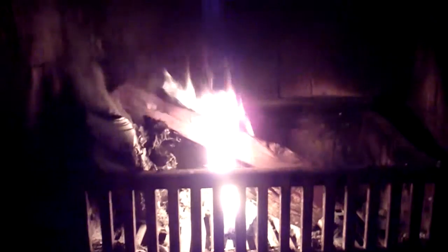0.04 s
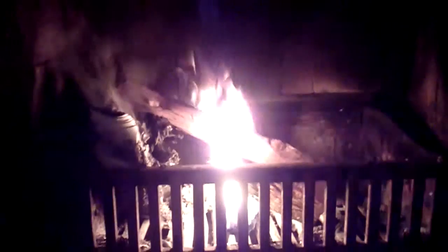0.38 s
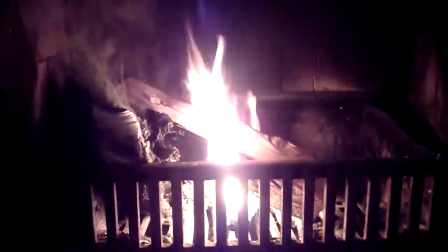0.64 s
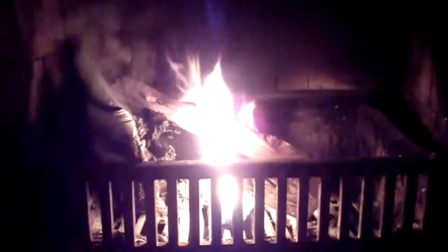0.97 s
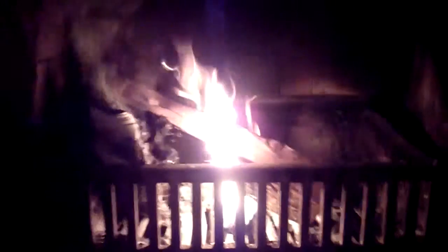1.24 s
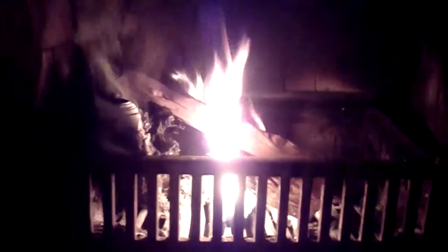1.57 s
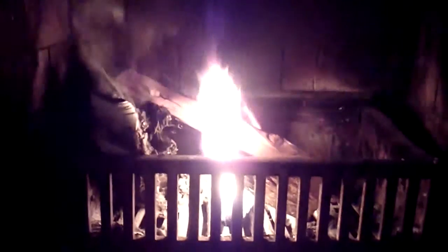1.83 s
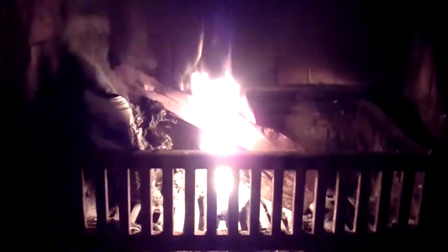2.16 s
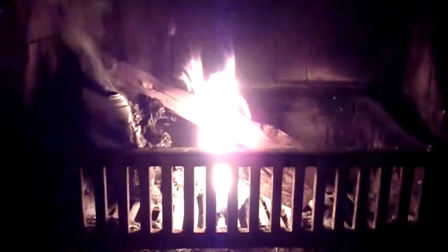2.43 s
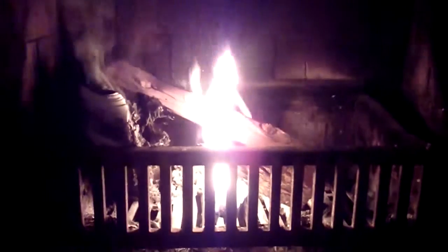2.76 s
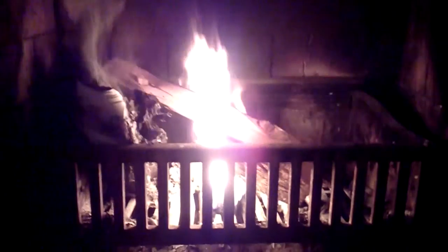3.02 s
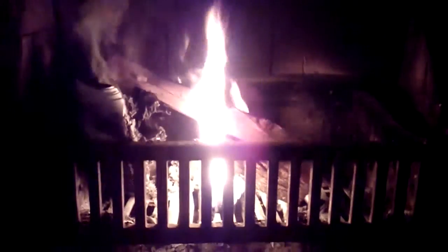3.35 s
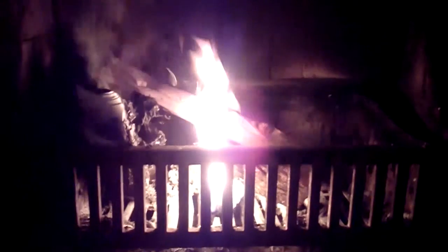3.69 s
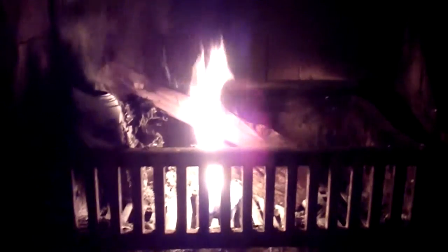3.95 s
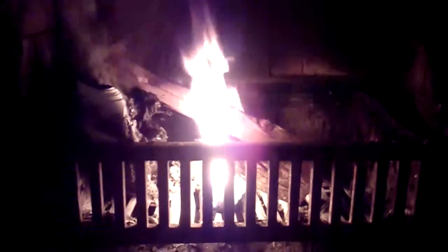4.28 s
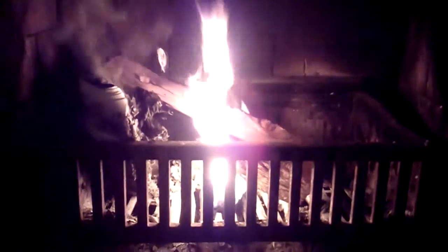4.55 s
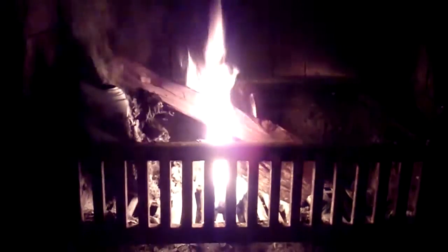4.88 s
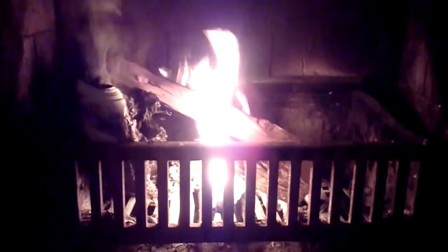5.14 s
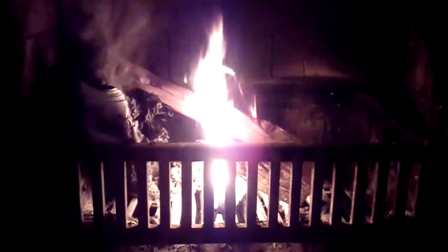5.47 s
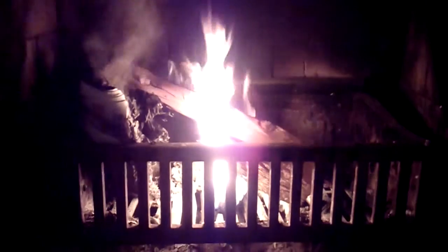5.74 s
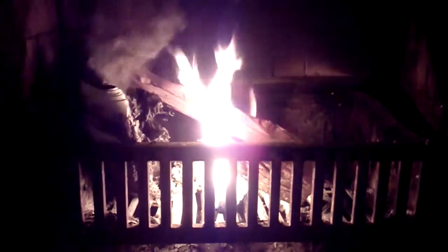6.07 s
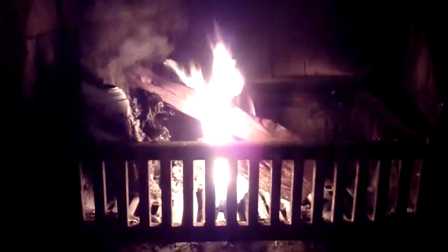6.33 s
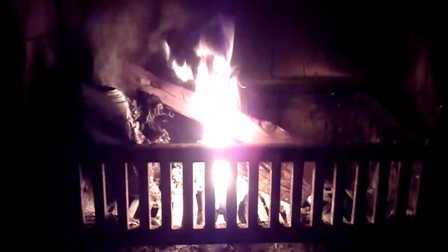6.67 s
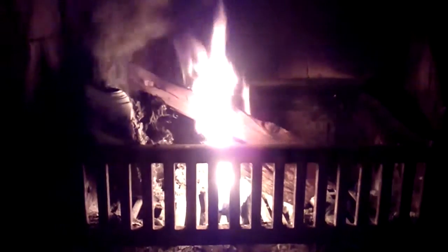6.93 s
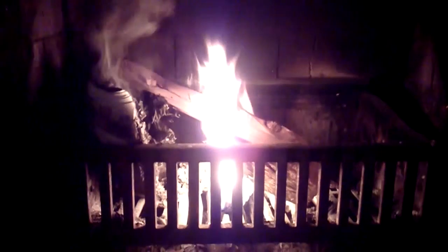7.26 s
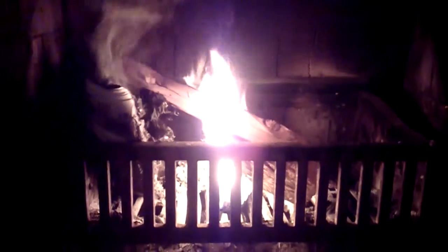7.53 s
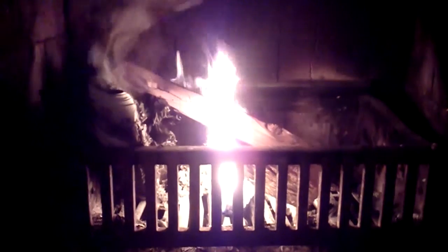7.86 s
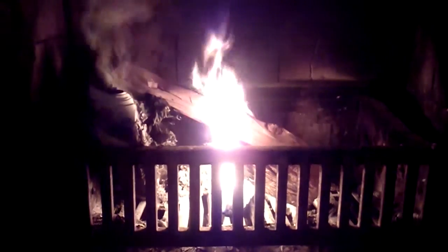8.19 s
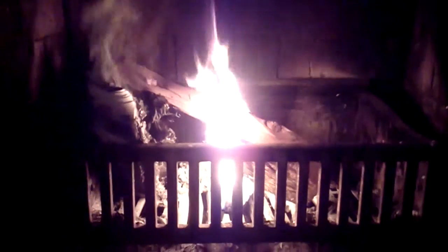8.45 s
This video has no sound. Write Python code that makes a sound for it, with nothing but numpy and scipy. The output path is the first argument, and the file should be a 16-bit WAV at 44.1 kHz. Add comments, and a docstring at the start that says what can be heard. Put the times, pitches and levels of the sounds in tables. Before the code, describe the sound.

A log fire rumbles softly and hisses in a fireplace, with one loud early pop and scattered small crackles.

```python
"""A log fire in an open fireplace, one microphone close in front of the grate.
From the start the flames rumble in the hearth's hollow, the hot wood hisses and gas leaves the log
in soft spurts. At 0.8 s a pocket in the wood bursts with one loud pop that rings the firebox and
the room. Small crackles go on snapping at uneven moments; at 5.5 s a gas jet whistles faintly,
and the fire flares and crackles on to the end."""
import sys
import numpy as np
from scipy import signal
from scipy.fft import rfft, irfft, next_fast_len
from scipy.io import wavfile
from scipy.ndimage import uniform_filter1d, map_coordinates

SR = 44100
rng = np.random.default_rng(int(sys.argv[2]) if len(sys.argv) > 2 else 0)


def wav_out(sig):
    """Save sig, one row per channel (or a flat mono array), as 16-bit PCM at SR to the path in sys.argv[1]."""
    wavfile.write(sys.argv[1], SR, np.round(np.clip(np.atleast_2d(sig).T, -1, 1) * 32767).astype(np.int16))


N = 375291


# spectrum of the flames at the grate: f/Hz, relative level/dB
FLAME_SPECTRUM = [(12, -9), (22, -8.5), (35, -9), (50, -11), (80, -9), (130, -4), (165, -11.5), (205, -15),
                  (250, -23), (400, -37), (900, -68)]
# low resonances of hearth and room: f/Hz, width/Hz, relative level/dB
HEARTH_MODES = [(64.9, 10.4, -1.5), (93.1, 12, -2), (117.6, 7.4, 1.5), (141.5, 15.3, -4.5), (193, 25, -13)]
# flares of the flame: t/s, level/dB above the steady burn
FLAME_FLARES = [(.12, 3.5), (.22, 4), (1.64, 6), (2.15, 3), (2.59, 3.5), (2.85, 4), (2.95, 2.5),
                (3.24, 3.5), (4.24, 3), (4.56, 7), (4.73, 4), (5.5, 4), (5.87, 6), (6.27, 5.5), (6.41, 5.5),
                (6.66, 8.5), (7.18, 1), (7.95, 5.5), (8.39, 2)]

def flames(burn_db=-48.5, flicker_db=1.2, flutter_db=1, flare_s=.04, puff_s=.12):
    """Turbulent burning drives the low resonances of the hearth in uneven puffs."""
    def colour(f):
        hollow = sum(amp(db) ** 2 / (1 + (2 * (f - hz) / width) ** 2) ** 2
                     for hz, width, db in HEARTH_MODES)
        return np.sqrt(amp(along(FLAME_SPECTRUM, f)) ** 2 + hollow)
    roar = noise(colour, N)
    power = np.abs(uniform_filter1d(roar ** 2, int(puff_s * SR)))
    roar = roar / np.sqrt(power + 1e-9)  # evened out, so the flame alone sets each puff's size
    t = np.arange(N) / SR
    flare_db = sum(db * np.exp(-((t - s) / flare_s) ** 2) for s, db in FLAME_FLARES)
    return roar * amp(burn_db + flare_db + flicker_db * wobble(11) + flutter_db * wobble(25))


# the splits that make up the loud pop: t/s, relative level/dB
POP_SPLITS = [(0.7717, -6), (.7738, -5), (.7775, -0.5), (.780, 0), (.783, -6), (0.791, -19), (.796, -11)]
# spectrum of the bursting wood: f/Hz, relative level/dB
BURST_SPECTRUM = [(45, -5), (130, -10.5), (200, -3.5), (240, -7), (320, -0.5), (470, 2.5), (560, -10),
                  (700, -1), (1100, -7), (1350, -14), (2600, -10.5), (2950, -4.5), (4700, -4.5),
                  (5600, -16), (7300, -30), (8500, -57)]
# modes of the firebox around the log: f/Hz, relative level/dB, t60/s
FIREBOX_MODES = [(126, -12, .9), (188, -16, .6), (318, -12, .5), (345, -6, .6), (382, -12, .45),
                 (435, -8, .5), (451, 1, .28), (475, 1, .45), (607, -10, .35), (707, -9, .33),
                 (735, -8, .42), (800, -13, .35), (906, -5, .38), (992, -12, .35), (1045, -11, .28),
                 (1104, -10, .38), (1143, -12, .3), (1422, -15, .3), (1770, -17, .38), (1915, -14, .26),
                 (2219, -14, .25), (3166, -6, .26), (3659, -11, .28), (3816, -6, .27), (3865, -9, .24),
                 (4084, -10, .38)]

def pop(split_db=-23.5, split_t60=.06, ring_db=-28, swell_s=.0013, room_db=-23.5):
    """A pocket bursts in a quick run of splits; the firebox rings and the room answers."""
    t, out = np.arange(SR) / SR, np.zeros(N)
    colour = lambda f: amp(along(BURST_SPECTRUM, f))
    for s, db in POP_SPLITS:
        add(out, s, amp(split_db + db - 60 * t / split_t60) * noise(colour, SR))
    ring = sum(amp(db - 60 * t / t60) * np.sin(2 * np.pi * (hz * t + rng.random()))
               for hz, db, t60 in FIREBOX_MODES)
    ring *= 1 - np.exp(-t / swell_s)
    echo = filtered(room_tail(build_s=.0026), colour)
    echo = echo / np.std(echo[:SR // 10]) / 2  # rms 0.5 over the first 0.1 s
    first_blow_s = POP_SPLITS[1][0]  # the faint lead-in split hardly stirs the firebox
    add(out, first_blow_s, amp(ring_db) * ring + amp(room_db) * echo)
    return out


# clear snaps in the log: t/s, peak level/dB, centre f/Hz, knock size over snap size
LOG_SNAPS = [(.141, -40, 4400, 0), (.250, -32.5, 4320, 0.64), (.445, -40, 5100, 0),
             (0.659, -26.5, 3720, 0.28), (0.744, -35, 5170, 0.04), (1.6302, -42, 5100, 0),
             (1.8342, -44, 5470, 0), (2.1308, -37.5, 4200, 0.35), (2.499, -36.5, 5770, 0),
             (2.9327, -39.5, 5100, 0.066), (3.4, -41.5, 4170, 0.43), (3.6334, -43, 5550, 0),
             (4.8868, -36.5, 3330, 0), (4.984, -36.5, 4500, 0.82), (5.046, -40, 3800, 0),
             (5.4545, -46, 3500, 1), (5.83, -38, 2790, 0), (6.0327, -35, 5000, 0.1),
             (6.2851, -38.5, 4600, 0.31), (6.4976, -39.5, 4900, 0), (6.769, -40.5, 5040, 0),
             (6.869, -40.5, 4200, 0), (7.04, -40.5, 4400, 0), (7.3241, -31.5, 3480, 0.24),
             (7.621, -40.5, 4400, 0), (8.0343, -37.5, 5700, 0)]

def crackles(tick_count=220, tick_db=-50.5, spread_db=1.9, tick_hz=4700, room_db=-12):
    """Clear snaps, some with a woody knock, over a scatter of tiny ticks, answered by the walls."""
    out = np.zeros(N)
    for s, db, hz, depth in LOG_SNAPS:
        octaves = max(.59 + .22 * np.log2(4500 / hz), .1)  # lower snaps spread wider
        crack = snap(hz, t60=.02, ping=.23, octaves=octaves)
        knock = snap(1600, t60=.028, ping=.33, octaves=.78)  # from a crack deep in the log
        add(out, s, amp(db) * (crack + depth * knock))
    for when, size, pitch in rng.random((tick_count, 3)):
        strength = min(-np.log(1 - size), 3)  # most ticks are tiny
        tick = snap(tick_hz * 2 ** (pitch - .5), t60=.013)
        add(out, when * N / SR, amp(tick_db + spread_db * strength) * tick)
    echo = signal.fftconvolve(out, room_tail(build_s=.0042))[:N]
    return out + amp(room_db) * echo


def snap(hz, t60, ping=0, octaves=.66, attack_s=.00032):
    """One fibre breaks: a short coloured burst and the splinter's own ping, with peak 1."""
    t = np.arange(SR // 16) / SR
    fade = amp(-60 * t / t60) * (1 - np.exp(-t / attack_s))
    crack = noise(lambda f: hump(f, hz, octaves), len(t))
    tone = unit(np.sin(2 * np.pi * hz * t))
    burst = fade * ((1 - ping) * crack + ping * tone)
    return burst / np.abs(burst).max()


# gas escaping from the log: peak t/s, relative level/dB, fall/s, centre f/Hz, spread/octaves
GAS_SPURTS = [(.035, -49, 0.049, 2860, .98), (.286, -49, 0.078, 3280, 0.85), (1.62, -54.5, .04, 1120, 0.79),
              (3.06, -57, 0.059, 4500, .73), (3.58, -55.5, .07, 4360, .5), (3.8, -57.5, .04, 1100, .73),
              (3.995, -55, 0.097, 4400, .5), (4.27, -56, .09, 3880, 0.8), (5.6, -63, 0.16, 3900, .17),
              (5.8, -58, .24, 2720, 0.99)]

def gas_spurts(gain_db=-1, sputter_db=1.5, rise_share=.62):
    """Each spurt swells, sputters and dies away as its pressure is spent."""
    t, out = np.arange(N) / SR, np.zeros(N)
    for s, db, fall_s, hz, octaves in GAS_SPURTS:
        before, after = np.minimum(t - s, 0), np.maximum(t - s, 0)
        flow = np.exp(-(before / (rise_share * fall_s)) ** 2 - after / fall_s)
        out += amp(db) * flow * noise(lambda f: hump(f, hz, octaves), N)
    return out * amp(gain_db + sputter_db * wobble(150))


def gas_whistle(start_s=5.53, level_db=-57.5, rise_s=.012, fall_s=.18,
                low_hz=3500, climb_hz_per_s=1300, waver_hz=70):
    """One gas jet sings faintly in a narrow crack, its pitch climbing as it fades."""
    t = np.clip(np.arange(N) / SR - start_s, 0, 2)
    hz = low_hz + climb_hz_per_s * t + waver_hz * wobble(200)
    flow = (1 - np.exp(-t / rise_s)) * np.exp(-t / fall_s)
    tone = np.sin(2 * np.pi * np.cumsum(hz) / SR)
    return amp(level_db) * flow * unit(tone * (1 + wobble(80)))


# spectrum of the steady hiss: f/Hz, relative level/dB
HISS_SPECTRUM = [(100, 6), (280, 4.5), (450, 3.5), (600, 0), (900, -1.5), (1300, -4.5), (2000, -6),
                 (3000, -7.5), (4200, -5), (5300, -7.5), (6300, -10), (7400, -12), (8200, -22), (8900, -38)]
# how hard the hot wood hisses: t/s, relative level/dB
HISS_DRIFT = [(1.1, -58), (1.22, -59), (3.96, -58), (5.43, -58.5), (5.71, -57), (6.13, -58), (7.3, -59),
              (8.5, -58.5)]

def wood_hiss(level_db=-54, drift_share=.8, flicker_db=.5):
    """The even hiss of hot wood over the quiet room, slowly rising and sinking."""
    sizzle_db = np.interp(np.arange(N) / SR, *np.transpose(HISS_DRIFT))
    drift_db = drift_share * (sizzle_db - sizzle_db.mean())
    hiss = noise(lambda f: amp(along(HISS_SPECTRUM, f)), N)
    return hiss * amp(level_db + drift_db + flicker_db * wobble(14))


# decay of the room behind the microphone: f/Hz, t60/s
ROOM_DECAY = [(120, 0.62), (300, 0.48), (1000, 0.52), (2500, 0.38), (4200, 0.36), (7000, .33)]

def room_tail(build_s):
    """Diffuse echoes of energy 1 that build up quickly, then die band by band."""
    hz, t, bands = signal.stft(rng.standard_normal(SR), SR, nperseg=256)
    fade = amp(-60 * t / along(ROOM_DECAY, hz)[:, None])
    tail = signal.istft(bands * fade, SR, nperseg=256)[1][:SR]
    tail *= 1 - np.exp(-np.arange(SR) / SR / build_s)
    return tail / np.linalg.norm(tail)


def amp(db):
    """Decibels to gain."""
    return 10 ** (np.asarray(db) / 20)


def unit(x):
    """Scale to rms 1."""
    return x / np.sqrt(np.mean(x ** 2) + 1e-20)


def along(points, hz):
    """Read (f/Hz, value) points on a log frequency axis."""
    f, values = np.transpose(points)
    return np.interp(np.log(hz + 1), np.log(f), values)


def wobble(rate):
    """A smooth random curve, rate knots a second."""
    knots = rng.standard_normal(int(N * rate / SR) + 4)
    return map_coordinates(knots, [np.arange(N) * rate / SR])


def filtered(x, response):
    """Shape the spectrum of x by a gain that depends on frequency."""
    n = x.shape[-1]
    padded = next_fast_len(n + 2048)
    gain = response(np.fft.rfftfreq(padded, 1 / SR))
    return irfft(rfft(x, padded) * gain, padded)[..., :n]


def noise(response, size):
    """Coloured noise of rms 1."""
    return unit(filtered(rng.standard_normal(size), response))


def hump(hz, centre, octaves, edge_hz=7400):
    """A spectral hump around a centre, with little left in the high treble."""
    return np.exp(-.5 * (np.log2((hz + 1) / centre) / octaves) ** 2) / (1 + (hz / edge_hz) ** 20)


def add(track, s, sound):
    """Mix a sound in at time s."""
    part = track[max(round(s * SR), 0):][:len(sound)]
    part += sound[:len(part)]


def scene():
    """The whole fire in mono, from in front of the grate."""
    return (flames() + pop() + crackles() + gas_spurts() + gas_whistle() + wood_hiss())[None]


def record(dry):
    """The recorder behind the microphone keeps nothing above its band limit."""
    top_hz = 8850
    return filtered(dry, lambda hz: 1 / (1 + (hz / top_hz) ** 120))


dry = scene()
out = record(dry)
wav_out(out)
```